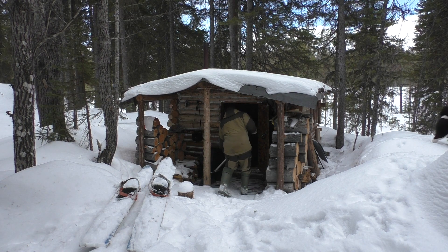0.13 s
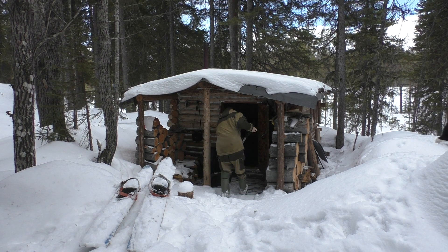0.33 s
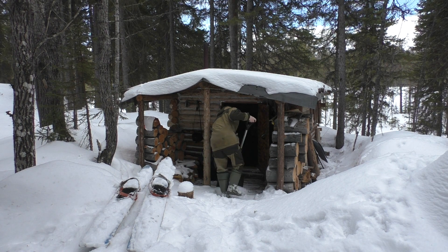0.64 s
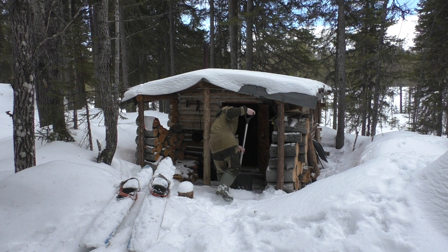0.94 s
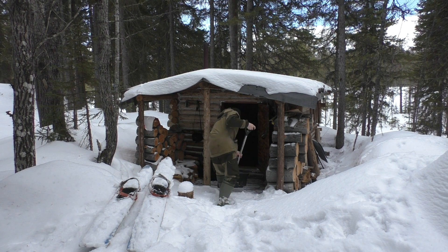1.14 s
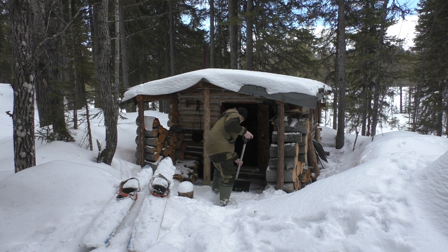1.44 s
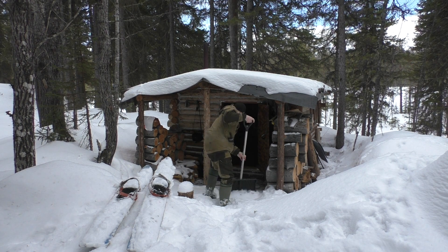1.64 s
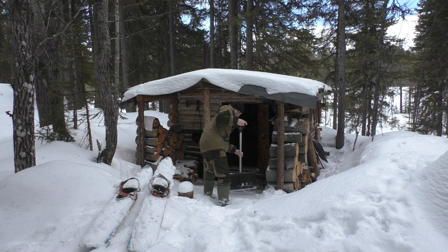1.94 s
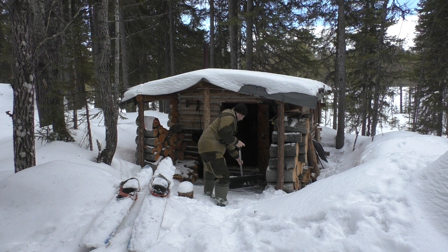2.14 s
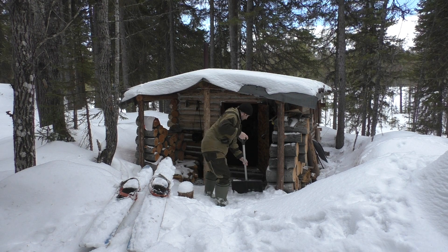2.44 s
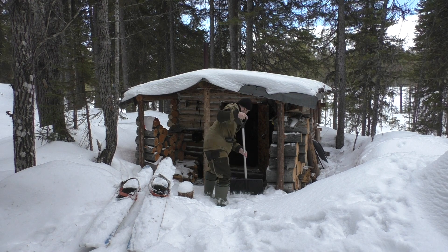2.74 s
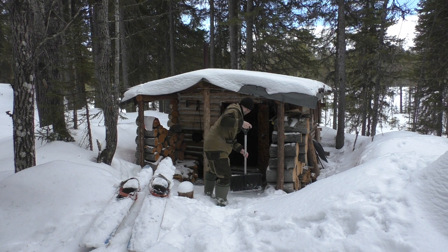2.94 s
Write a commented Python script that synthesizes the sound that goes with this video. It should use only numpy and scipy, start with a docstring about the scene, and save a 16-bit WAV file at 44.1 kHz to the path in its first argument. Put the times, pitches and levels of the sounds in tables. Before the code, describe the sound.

Snow shovel scraping: three juddering, raspy strokes on hard snow at a hut doorway

```python
"""Still forest air, then a shovel blade thuds into the packed snow of a hut's doorway, a few metres away.
In three strokes it judders as slips and rubbing flex the blade, then rasps as crystals break on icy crust.
Damped sines make the thuds, ringing noise the catches on ice and the ticking crumbs.
Boots, swells of coloured noise, shift softly between the strokes.
The log wall answers briefly and the trees more faintly, both as decaying noise."""
import sys
import numpy as np
from scipy import signal
from scipy.fft import rfft, irfft, next_fast_len
from scipy.io import wavfile
from scipy.ndimage import uniform_filter1d, map_coordinates

SR = 44100
rng = np.random.default_rng(int(sys.argv[2]) if len(sys.argv) > 2 else 0)


def bounce(signal):
    """Save signal as a 16-bit WAV file at the path given by the first command-line argument."""
    frames = np.transpose(np.atleast_2d(signal))
    limited = np.clip(frames, -1, 1)
    pcm = np.round(limited * 32767).astype(np.int16)
    wavfile.write(sys.argv[1], SR, pcm)


N = 134505

# Resonances of the scraping blade. Each row: frequency in Hz, width in Hz, gain in dB.
BLADE_MODES = [(733, 24, 1.5), (937, 17, 0), (1160, 69, 3), (1530, 65, -6), (1884, 170, -5),
               (2870, 110, -25), (3700, 260, -0.5), (4030, 290, 1)]
# Colour of breaking crust. Each row: frequency in Hz, gain in dB.
CRUST_COLOUR = [(25, -3), (70, 2.5), (150, -6), (290, 1), (400, -3), (580, -8), (760, -5.5), (1200, -3),
                (2200, -5), (3600, -6), (5300, -11.5), (7200, -14), (10000, -21), (12500, -30),
                (15800, -38.5)]
BLADE_RING_DB = 1.5  # gain of the resonances beside the direct force


def amp(db):
    """Decibels to gain."""
    return 10 ** (np.asarray(db) / 20)


def unit(x):
    """Scale to rms 1."""
    return x / np.sqrt(np.mean(x ** 2) + 1e-20)


def peaked(x):
    """Scale to peak 1."""
    return x / np.abs(x).max()


def filtered(x, response):
    """Multiply the spectrum of x by a response of frequency in Hz."""
    size = 2 * next_fast_len(len(x) // 2 + 4096)
    spectrum = rfft(x, size) * response(np.fft.rfftfreq(size, 1 / SR))
    return irfft(spectrum, size)[:len(x)]


def coloured(x, points):
    """Causal minimum-phase filter through (Hz, dB) points, by folding the cepstrum."""
    def response(hz):
        point_hz, point_db = np.transpose(points)
        db = np.interp(np.log(hz + 1), np.log(point_hz + 1), point_db)
        cepstrum = irfft(np.log(amp(db)))
        half = len(cepstrum) // 2
        cepstrum[1:half] *= 2
        cepstrum[half + 1:] = 0
        return np.exp(rfft(cepstrum))
    return filtered(x, response)


def ringing(x, modes):
    """Drive parallel second-order resonances (Hz, width Hz, dB) with x."""
    def response(f):
        return sum(amp(db) * 1j * f * width / (hz * hz - f * f + 1j * f * width)
                   for hz, width, db in modes)
    return filtered(x, response)


def gain(strokes):
    """Gain per sample from each stroke's first two columns (s, dB), dying away after its last row."""
    release_db_per_s = 252
    t = np.arange(N) / SR
    total = np.zeros(N)
    for rows in strokes:
        s, db = np.transpose(rows)[:2]
        level_db = np.interp(t, s, db, left=-200)
        total += amp(level_db - release_db_per_s * np.maximum(t - s[-1], 0))
    return total


def add(track, s, sound):
    """Mix a sound into the track at s seconds."""
    part = track[round(s * SR):][:len(sound)]
    part += sound[:len(part)]


def burst(t60_s):
    """Exponentially dying white noise, a quarter second long."""
    t = np.arange(SR // 4) / SR
    return rng.standard_normal(len(t)) * amp(-60 * t / t60_s)


def wobble(knots_per_s):
    """Smooth random curve: a spline through normal draws."""
    return map_coordinates(rng.standard_normal(N // 10), [np.arange(N) * knots_per_s / SR])


def bent(x, ratio):
    """Shift all of a steady sound's frequencies by a moving ratio, reading it at that speed."""
    return map_coordinates(x, [np.cumsum(ratio) % (N - 1)])


def patchy(x):
    """Random gain over time and frequency: the colour keeps shifting as the edge meets new snow."""
    patch_db = 1.4
    z = signal.stft(x, nperseg=512)[2]
    field = uniform_filter1d(rng.standard_normal(z.shape), size=5, axis=0)
    field = uniform_filter1d(field, size=7, axis=1)
    return signal.istft(z * amp(patch_db * unit(field)), nperseg=512)[1][:N]


def still_air():
    """Steady noise of the still air, weighted to the lows."""
    # Each row: frequency in Hz, gain in dB.
    air_colour = [(20, -3), (60, -6.5), (110, -14), (190, -24), (480, -20.5), (1050, -25), (1500, -29.5),
                  (3100, -31), (8000, -35.5), (12000, -41.5), (15800, -46)]
    rms_db = -53.5
    return amp(rms_db) * unit(coloured(rng.standard_normal(N), air_colour))


def echo(x, t60_s, delay_s):
    """Diffuse answer of the surroundings: decaying-noise tails, redrawn at even intervals and crossfaded."""
    out, t = np.zeros(N), np.arange(SR) / SR
    centres = np.linspace(0, N, num=12)
    for centre in centres:
        tail = rng.standard_normal(SR) * amp(-60 * t / t60_s)
        share = np.clip(1 - np.abs(np.arange(N) - centre) / centres[1], 0, 1)
        answer = signal.fftconvolve(x * np.sqrt(share), tail / np.linalg.norm(tail))
        add(out, delay_s, answer)
    return coloured(out, [(100, 8.5), (1000, 7), (4000, 0.5), (12000, 8)])


def surroundings(work):
    """A short answer of the log wall and a longer, fainter one of the trees."""
    wall_gain_db, forest_gain_db = -14, -28
    wall = amp(wall_gain_db) * echo(work, t60_s=0.15, delay_s=0.004)
    forest = amp(forest_gain_db) * echo(work, t60_s=0.85, delay_s=0.021)
    return wall + forest


def boots():
    """Compressed snow: coloured noise under bell-shaped swells of weight."""
    # Each row: centre in seconds, level in dB, half length (standard deviation) in seconds.
    steps = [(1.183, -40, 0.027), (1.326, -47.5, 0.052), (1.967, -52.5, 0.016), (2.042, -49, 0.038)]
    # Each row: frequency in Hz, gain in dB.
    boot_colour = [(30, 8), (90, 2), (220, -1), (400, -10), (700, -9.5), (1500, -22.5), (5000, -29),
                   (15000, -45)]
    t = np.arange(N) / SR
    weight = sum(amp(db) * np.exp(-.5 * ((t - s) / half_s) ** 2) for s, db, half_s in steps)
    return weight * unit(coloured(rng.standard_normal(N), boot_colour))


def crumbs():
    """Ice crumbs tick: short noise bursts each ring one broad resonance."""
    # Each row: start in seconds, peak in dB, pitch in Hz.
    ticks = [(1.963, -46, 7050), (2.316, -41, 10930), (2.323, -30, 3825), (2.394, -30, 4010),
             (2.405, -20.5, 3800), (2.414, -28, 3430), (2.9404, -39.5, 6600)]
    width_ratio, burst_t60_s = 0.15, 0.0083
    out = np.zeros(N)
    for s, db, hz in ticks:
        tick = ringing(burst(burst_t60_s), [(hz, width_ratio * hz, 0)])
        add(out, s, amp(db) * peaked(tick))
    return out


def catches():
    """The edge catches on ice: dying noise rings the blade, coloured as crust."""
    # Each row: start in seconds, peak in dB, burst T60 in seconds.
    ice_hits = [(0.293, -28, 0.05), (0.639, -28, 0.081), (.776, -37, 0.016), (0.805, -28, 0.034),
                (0.826, -23, 0.077), (0.936, -15, 0.034), (1.503, -12, 0.035), (2.366, -20, 0.02),
                (2.485, -5.5, 0.01), (2.664, -19.5, 0.014), (2.726, -21.5, 0.1), (2.74, -16.5, .03)]
    out = np.zeros(N)
    for s, db, t60_s in ice_hits:
        force = burst(t60_s)
        ring = amp(BLADE_RING_DB) * ringing(force, BLADE_MODES)
        add(out, s, amp(db) * peaked(coloured(force + ring, CRUST_COLOUR)))
    return out


def thuds():
    """The blade knocks on packed snow or hard ground: a damped sine with a noisy crunch."""
    # Each row: start in seconds, knock peak in dB, pitch in Hz, T60 in cycles, crunch in dB re knock.
    knocks = [(0.2167, -13, 298, 8.4, -11), (.2235, -14, 331, 7, -8.5), (0.2407, -10.5, 236, 4.1, -33),
              (0.398, -9.5, 162, 5.9, -26), (.495, -11.5, 156, 4.6, -10.5), (1.3745, -5, 221.3, 1.3, -18.5),
              (1.382, -41, 228.7, 4.67, 11.5), (2.3245, -21, 138.3, 4, -42), (2.3672, -6, 180, 1.9, -11.5),
              (2.415, -12, 103, 9.1, -14), (2.48, -17.5, 118.5, 4.8, -13), (2.4843, -10, 1167, 35, -11)]
    # Each row: frequency in Hz, gain in dB.
    crunch_colour = [(60, -1), (290, -11), (480, -19.5), (800, -6), (1800, -15.5), (4000, -39),
                     (8000, -34.5), (15000, -53)]
    rise_s, crunch_t60_s = 0.0004, 0.066
    out, t = np.zeros(N), np.arange(SR // 4) / SR
    for s, db, hz, cycles, crunch_db in knocks:
        decay = amp(-60 * t * hz / cycles)
        knock = np.sin(2 * np.pi * hz * t) * decay * (1 - np.exp(-t / rise_s))
        crunch = peaked(coloured(burst(crunch_t60_s), crunch_colour))
        add(out, s, amp(db) * (peaked(knock) + amp(crunch_db) * crunch))
    return out


def judder():
    """Soft, uneven slips and rubbing flex the blade; its moving pitch follows the load of snow."""
    # One table per stroke. Each row: time in seconds, level in dB before trim, main mode's pitch in Hz.
    pushes = [
        [(.216, -24.5, 205.5), (.25, -24, 202.3), (.28, -28.5, 198.2), (.35, -33.5, 192.1), (.39, -29, 181.2),
         (.47, -24.5, 185), (.5, -21.5, 193.2), (.545, -22, 206), (.6, -24, 204.6), (.665, -30, 205),
         (.70, -33, 170.4), (.86, -48.5, 188.8), (.94, -27.5, 203.5), (.975, -66, 198)],
        [(1.376, -21, 189.4), (1.41, -30, 177.5), (1.465, -25.5, 160), (1.5, -29, 167.3), (1.54, -43, 130),
         (1.68, -43, 120)],
        [(2.368, -36.5, 230.4), (2.39, -29, 220), (2.42, -25, 115.3), (2.45, -32.5, 113.1), (2.485, -25, 199.8),
         (2.53, -43, 206), (2.62, -46, 224.4), (2.69, -44, 212.7), (2.71, -60, 197)],
    ]
    # Flexing modes. Each row: frequency in Hz, width in Hz, gain in dB.
    flex_modes = [(92, 61, 1), (136, 46, 4), (202.7, 46, 7.5), (290, 16.7, 6), (440, 98, -1),
                  (596, 90, -5.5), (820, 66, -6.5), (898, 55, -1.5)]
    slips_per_s, slip_jitter, slip_scatter_db = 105, 0.45, 3.5  # median rate, before the pitch bend
    soft_hz, rub, rest_hz, trim_db = 1150, 1, 205, 1.5
    draws = rng.standard_normal((1000, 2))
    times = np.cumsum(np.exp(slip_jitter * draws[:, 0])) / slips_per_s
    slips = np.bincount((times * SR).astype(int), amp(slip_scatter_db * draws[:, 1]), N)[:N]
    force = unit(slips) + rub * rng.standard_normal(N)
    force = filtered(force, lambda hz: 1 / (1 + (hz / soft_hz) ** 4))
    flexing = ringing(ringing(force, flex_modes), flex_modes)
    s, _, pitch_hz = np.concatenate(pushes).T
    ratio = np.interp(np.arange(N) / SR, s, pitch_hz) / rest_hz
    groan = bent(flexing, ratio)
    return unit(groan) * gain(pushes) * amp(trim_db)


def rasp():
    """Crystals break in clumps over a powdery hiss; load detunes the blade, harder scraping is brighter."""
    # One table per stroke. Each row: time in seconds, level in dB before trim and brightening.
    scrapes = [
        [(0.2, -121), (0.22, -34.5), (0.282, -52), (0.296, -37), (0.334, -45), (0.384, -37.5), (0.46, -39),
         (0.552, -35), (0.632, -42.5), (0.642, -27.5), (0.728, -36), (0.78, -24), (0.796, -34.5),
         (0.826, -25.5), (0.924, -33), (0.936, -24.5), (0.992, -50), (1.1, -74)],
        [(1.35, -68), (1.362, -88), (1.374, -41.5), (1.42, -40), (1.46, -24.5), (1.49, -25), (1.504, -22.5),
         (1.516, -25.5), (1.624, -26), (1.692, -34.5), (1.712, -46), (1.788, -52), (1.822, -47), (1.856, -58.5),
         (1.9, -59)],
        [(2.28, -88), (2.312, -46), (2.346, -54), (2.368, -35.5), (2.382, -47), (2.416, -32), (2.452, -37.5),
         (2.486, -24), (2.506, -27), (2.602, -29), (2.608, -24), (2.668, -25), (2.688, -58), (2.718, -44.5),
         (2.732, -29), (2.756, -28), (2.792, -49), (2.88, -80)],
    ]
    grains_per_s, grain_scatter_db, powder = 2400, 5, 0.82
    chatter_knots_per_s, chatter_db = 110, 1.5
    load_knots_per_s, load_bend = 14, 0.045
    bright_hz, bright_exponent, full_db, trim_db = 6450, 0.1, -25, -0.5

    grains = (rng.random(N) < grains_per_s / SR) * rng.choice([-1, 1], N)
    grains = grains * amp(grain_scatter_db * np.clip(rng.standard_normal(N), -2, 2))
    force = unit(grains) + powder * rng.standard_normal(N)
    force = force * amp(chatter_db * wobble(chatter_knots_per_s))
    ring = bent(ringing(force, BLADE_MODES), 1 + load_bend * wobble(load_knots_per_s))
    sound = coloured(patchy(force + amp(BLADE_RING_DB) * ring), CRUST_COLOUR)
    # rms 1 above 1500 Hz
    sound = sound / filtered(sound, lambda hz: hz > 1500).std()

    dull = filtered(sound, lambda hz: 1 / (1 + (hz / bright_hz) ** 2))
    level = gain(scrapes)
    brightness = (level / amp(full_db)) ** bright_exponent
    return amp(trim_db) * level * (dull + (sound - dull) * brightness)


def scene():
    """Shovel and boots, answered by wall and trees, in the still air."""
    work = boots() + crumbs() + catches() + thuds() + judder() + rasp()
    return (work + surroundings(work) + still_air())[None]


def record(dry):
    """Band limit: keep nothing above top_hz."""
    top_hz = 15850
    return np.array([filtered(dry[0], lambda hz: hz < top_hz)])


dry = scene()
out = record(dry)
bounce(out)
```